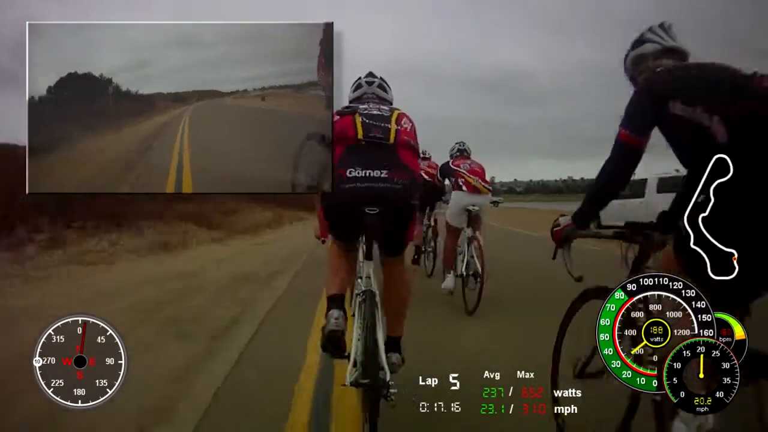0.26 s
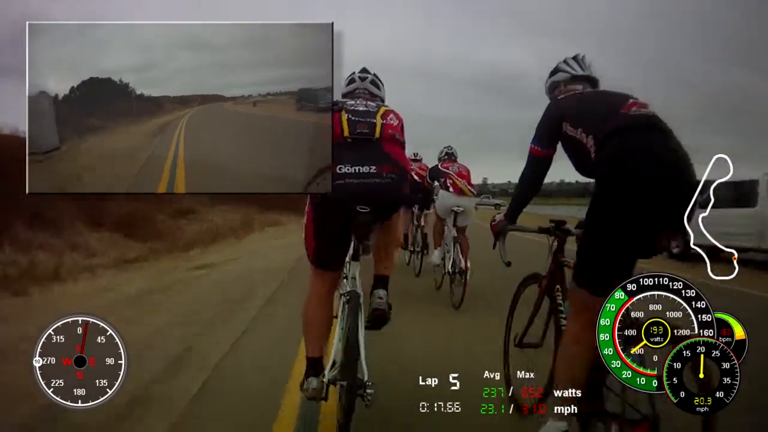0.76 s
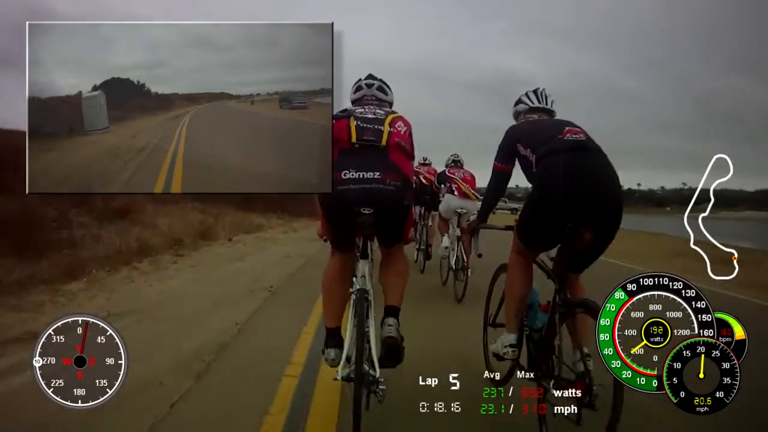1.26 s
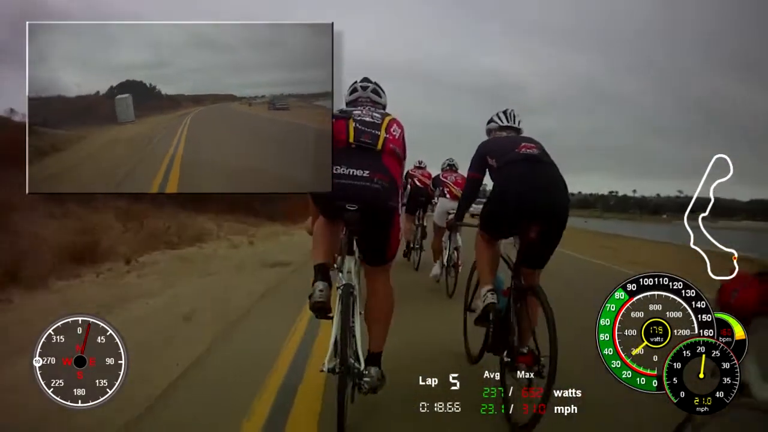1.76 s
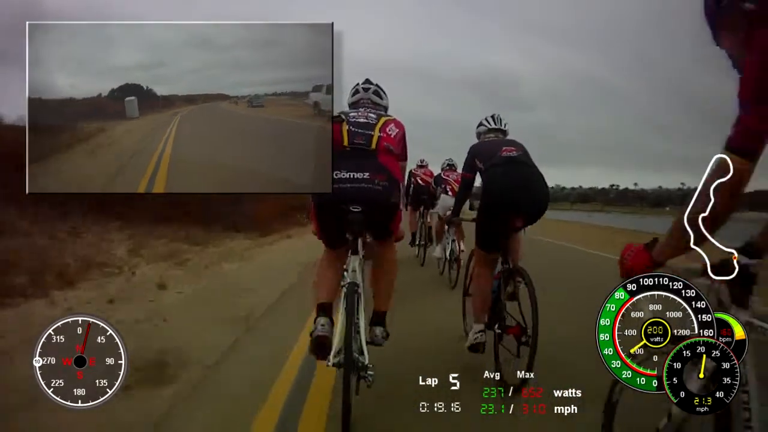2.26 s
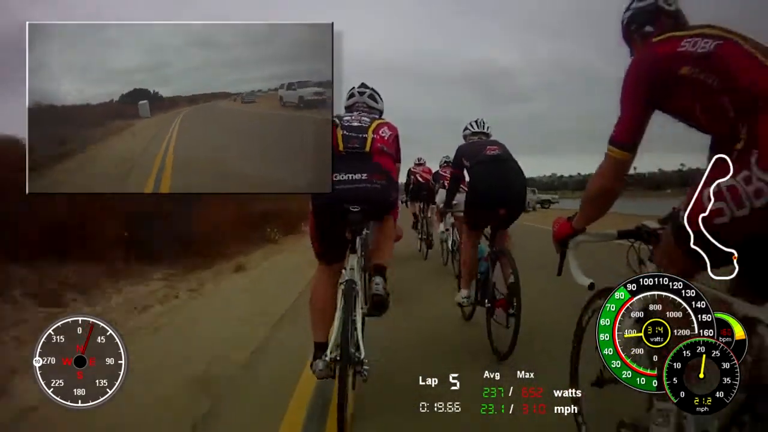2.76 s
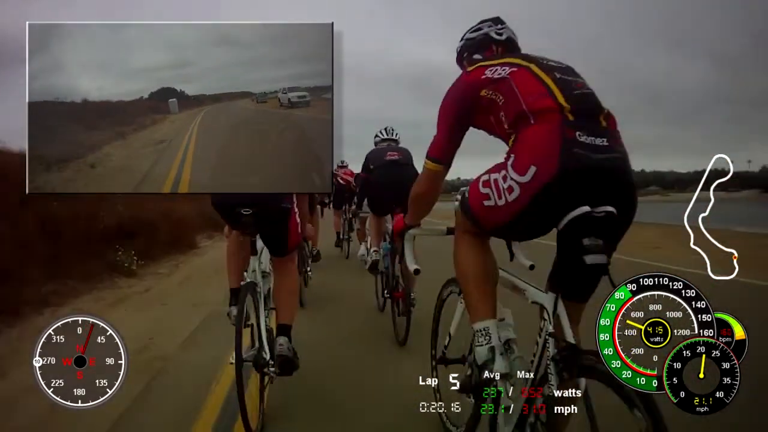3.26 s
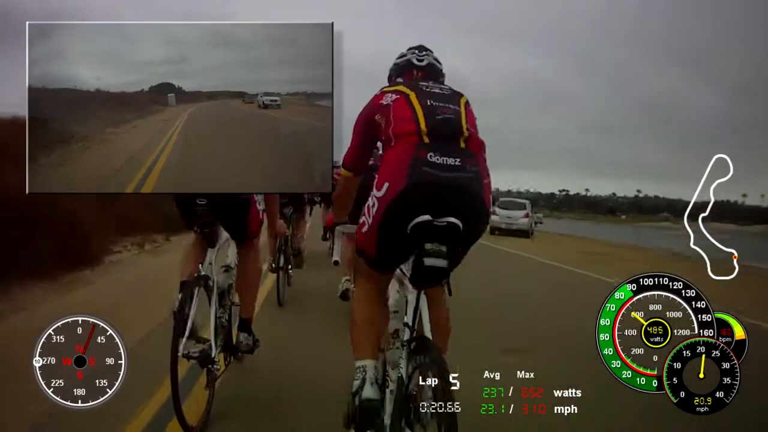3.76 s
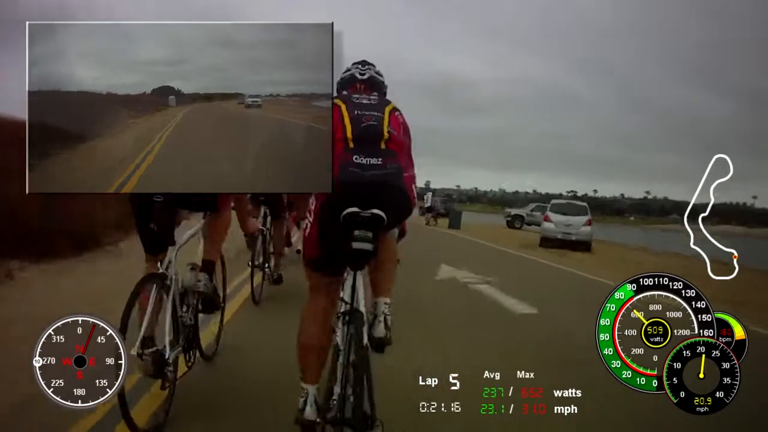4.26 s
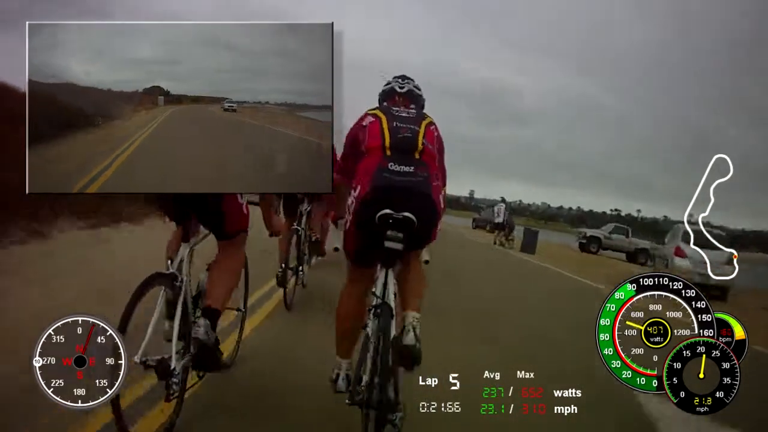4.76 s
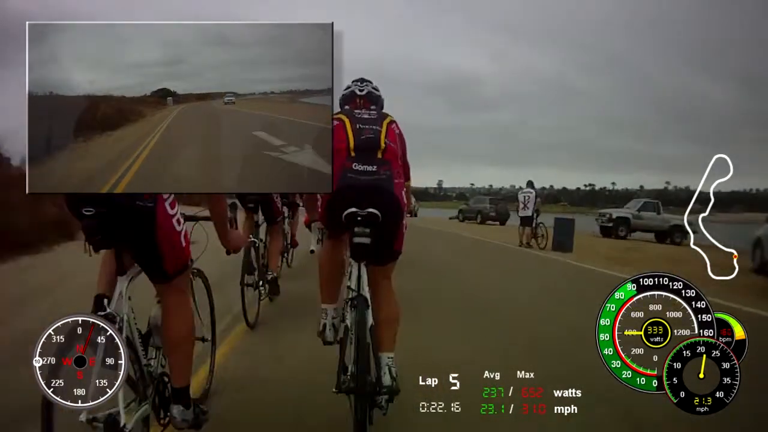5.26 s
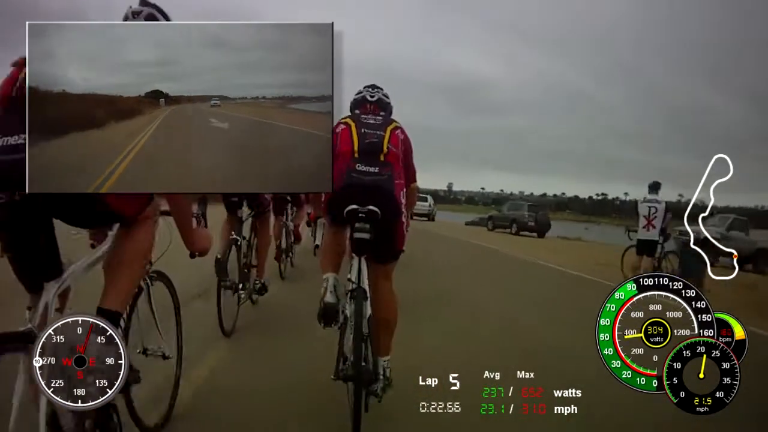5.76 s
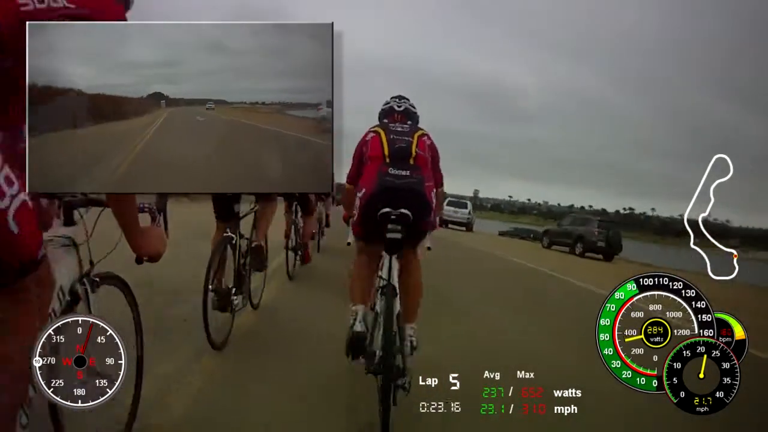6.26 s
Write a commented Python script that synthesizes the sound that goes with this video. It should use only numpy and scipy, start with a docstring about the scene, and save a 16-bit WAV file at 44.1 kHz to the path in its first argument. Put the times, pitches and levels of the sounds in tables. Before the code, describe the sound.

Hard, close clicks and knocks come from a microphone mount shaking on a bicycle as it rides along a paved road. A sharp burst of rattling early on gives way to lighter scattered ticks, then another short burst and a longer, denser clatter to finish. A low hum and the rush of tyres and air continue throughout, with faint wind, hiss and whir.

```python
"""Hard knocks and ticks over a low hum: a camera rattling on a road bicycle that rolls fast over asphalt,
heard mostly through the frame. Loose parts strike and ring the bracket, housing, clamp and mount, in
bursts where the wheels cross seams, with a fine patter in between. Road grain shakes the mount into
its hum. Behind it lie the rush of tyres and air, a low wind rumble, a thin hiss and a faint whir."""
import sys
import numpy as np
from scipy import signal
from scipy.io import wavfile
from scipy.ndimage import uniform_filter1d

SR = 44100
rng = np.random.default_rng(int(sys.argv[2]) if len(sys.argv) > 2 else 0)


def persist_wave(psi):
    """Save psi, clipped to +-1, as 16-bit WAV."""
    counts = np.round(np.clip(psi, -1, 1) * 32767).astype(np.int16)
    wavfile.write(sys.argv[1], SR, np.atleast_2d(counts).T)


N = 286209

# The clear knocks: start_s, blow_db, tick_db, clack_db, thud_db, tilt (above 0 brightens the bracket).
# The blow is the bracket's level; housing tick, clamp clack and mount thud are relative to it.
KNOCKS = [(0.018, -45.5, 2.5, -4.5, 2, 11), (0.0745, -40.5, 0, -4.5, -7, 16),
          (0.1861, -44.0, -1, -7, 3, -3), (0.1962, -44.5, 3.5, -7, 1.5, -10),
          (0.2173, -55.5, 3, -6, -3, -4.0), (0.261, -54, -2, -7, 6, -7.5), (0.285, -46.5, 0, -1, 3.5, 2),
          (0.299, -45.5, 0, -4, -14.0, 5), (0.3289, -44.5, -0.5, -5, -2, -7),
          (0.4224, -44.5, -2.5, 3.5, 6.5, 5), (0.575, -42.5, -6, -3, 0.5, 2), (0.591, -53, 3, -8, -6, 5),
          (0.645, -47.5, 10, 1, -14.0, 7.0), (0.6523, -31.5, -1, -7.5, 0.5, 7),
          (0.6754, -38.5, 6, -1, -10, 2), (0.6828, -27, -1, -8, 0.5, 8), (0.69, -35.5, -10, -8, 1, 18),
          (0.6962, -35.5, 2, 1, 4, -5), (0.7051, -40.5, 2, -1, -16, 19), (0.7106, -27.5, 2, -4, 3, -17),
          (0.7162, -35, -16, -12, -16, -16), (0.72, -44, 3, -7, -10, 2), (0.7257, -37, -4, -3, 4.5, 5),
          (0.7615, -48.5, -5, -1, -10, -2), (0.7679, -48.5, -1, -3, 5, -10.0),
          (0.775, -36, 5, -10, -24, 15), (0.7808, -37.5, -3, -1, 3.5, 11), (0.7977, -33, -3.5, -6, 2, 1),
          (0.8189, -48, 7.5, -4, -13.5, -1.5), (0.8493, -43.5, -0.5, -6, -8, -4.0),
          (0.856, -46, -17, -2, -12, -12.0), (0.863, -48, 3, -6.5, 2, 12), (0.8668, -43.5, -7, -11, 4, 7),
          (1.0222, -51.0, -2, 8, 5, 7), (1.0861, -48.5, 2.5, -3, -10, -1), (1.0999, -43.5, 3, -2, -7, 11),
          (1.2153, -47, -10.5, -1.5, -14, -2.5), (1.3565, -45.0, -15, -1, -12, -6),
          (1.4554, -53, -7, 9.5, 1, -4), (1.5917, -55, -8.0, 7, -3, -5.0),
          (1.6204, -49.5, 2.5, 5.5, -14, 9.5), (1.7429, -42.5, -7.5, -4.5, -12, 16),
          (1.75, -49.5, -10, 1, 8, -14), (1.7764, -46.5, -26, -8, -1.0, -21), (1.819, -52, -9, 3, 13.5, -3),
          (1.844, -56.5, -18, 11, -1, -3), (1.8867, -51.5, 3, 5, 6, 2), (1.9012, -46.0, 1, -5, -14.0, -1),
          (1.9162, -41.5, -2, -14.5, -14.0, 13), (1.978, -50.5, -13, -1, -11, -15),
          (2.0055, -54.5, -6, 6.5, 3, -8.5), (2.0445, -49, -16, 1, 8, 1), (2.082, -55, -4, 8.5, 12, -9.5),
          (2.2393, -43.5, -16, -5.5, -16, -2), (2.3614, -59, -4, 12.5, -4, -6),
          (2.3793, -44, -4.5, -12.5, -10, 15), (2.397, -50, -4, 0, -9, 15), (2.463, -46, -5, -1, 4.5, -14),
          (2.52, -50.5, -2, 3, 12, 16), (2.569, -46.0, -13.5, -0.5, 9.5, -3), (2.5786, -49, -4, -6, 3, -9),
          (2.7293, -47.5, -15, 2.5, -2, 0), (2.8428, -46.0, -7, 3.5, 8, -15),
          (2.9233, -40.5, -4, -10, -6, 12), (3.1056, -46, -8, 1.5, 6.5, -10), (3.1191, -54, 0, 3, 15, 4),
          (3.1311, -52.5, -15, 10, 5.0, -6), (3.182, -61, -11, 17.5, 19, -2.0),
          (3.1923, -44.0, -28, -4, -6, -12.0), (3.2596, -52.5, -21, 4.5, 12.5, -7.5),
          (3.4374, -51.0, -6, -3, 5, -5.5), (3.4606, -54.5, -18, 7.5, 14.5, -16),
          (3.5619, -47.5, -15.5, -3.5, 5.5, -16), (3.65, -49, -17, -10, 3.5, -4),
          (3.752, -50.5, -12, -11, -14, -2), (3.8521, -42, -14, 0.5, 1.5, -4),
          (3.855, -44.5, -15, 3, 2, -4), (3.877, -53.5, -14, 4, 3, -6), (3.882, -50.5, -20.0, 4.5, 10, -4),
          (3.947, -56, 2, -6, -5, -11), (4.0449, -48.5, -22, 2, 5, -9), (4.166, -45, -3, -1.5, -16, 0),
          (4.1838, -52.5, -1, -4, 11, 2), (4.2183, -66, 8, 14.5, 23, 6.5), (4.386, -56.5, -19, 9, 16, 6),
          (4.4055, -42.5, -1, -2, -8, 16), (4.4103, -45, 9, -6, -4, 9), (4.417, -37, 8.5, -4, 0.5, -22),
          (4.4231, -44, -17, -4, -13, -1), (4.4346, -39.5, -14, -7, -12, 11),
          (4.4397, -30.0, -2.5, -2.5, -6, 11), (4.4453, -31.5, 1, -13, 0.5, 30),
          (4.4495, -39, -2.5, -13, 4, -10), (4.512, -48.5, 6, 0.5, -7, -15),
          (4.5328, -52.5, 5, -2.5, 3, -7), (4.549, -53, 6.5, -8, -1, -5.5),
          (4.6108, -47.5, -4.5, 4.5, 9.5, 9), (4.657, -48.0, -5.5, -0.5, -6.0, 7),
          (4.6871, -51, -3, 2, -3, 5), (4.8316, -56.5, 3, 7.5, 9, 0), (4.9007, -47.5, 1, 2, -7, -7),
          (4.95, -50, -6, 5, 6, -19), (5.0226, -50.0, -0.5, 3, 5, 5), (5.129, -47.0, -4, -11, -12, -2),
          (5.158, -48, 3.5, -12, -17, 0.0), (5.164, -52.5, 1, 5, 11.5, -8.0),
          (5.1728, -45, 2, 0.5, -2, 15.5), (5.226, -42.5, -12, -3, 2.5, 1),
          (5.2586, -53.0, 5, -20.0, 6, -5.5), (5.2853, -52, 1, -5, -1, -1.5),
          (5.3655, -56, 4.5, -8, -1, 6.5), (5.4364, -44.0, -0.5, -5, -19, 5.5),
          (5.4566, -48.5, 0, -15, -2, 3.0), (5.4794, -44.5, -2, -12, -15, -1),
          (5.53, -47, -8, 2, -13, -3.5), (5.5412, -48.5, -6, 9.5, 7, -6), (5.5518, -40.5, -9.5, 0, 3, -5),
          (5.56, -46, -13, 4, 2, -11), (5.5886, -51, 4, 3, -8.5, 2), (5.6034, -42.5, -5, -1, -4, 2),
          (5.6215, -46, -1, -5, 0, 12.0), (5.632, -45.5, -1, 0, 0, 0), (5.6459, -44.5, 1, -3, -14.0, 11),
          (5.6512, -39, -10, -7, -3, 10), (5.6654, -47.5, -1, -15, -16, 1),
          (5.6929, -45.5, 4, -12, -15, 13), (5.7235, -43.5, 1, -3.5, -18, 8),
          (5.784, -44.5, -2, -5, -17, 15), (5.7996, -44.5, 0, -16, -20, 8), (5.8079, -44.5, 3, -3, -7, -4),
          (5.816, -46, 2, -10, -15.5, 10), (5.822, -46, 0, 2, 0, -6.0), (5.846, -47.5, -3, -1, -3, 5),
          (5.9178, -40.5, -11, -6, -19, -10), (5.9233, -39.0, -6, -6, 0, 5),
          (5.9369, -45, 0, -19, -14.0, 11.0), (5.9562, -42, -4, 1, 7, 0),
          (5.969, -46.5, -4, 3, -11.5, 10.5), (6.0053, -39, 5.5, -9, -4, 12), (6.0121, -38, -5, -4, 0, 5),
          (6.0239, -36.5, 4, 0, -14, 14), (6.0309, -30, -0.5, -8, 1.5, 7), (6.045, -36, -3, -3, -2, 15),
          (6.0555, -42, 2, -9, -13.5, -3), (6.0632, -46.0, 4, -7, -10, -0.5),
          (6.0702, -38.5, 1, -8.0, -2, 6.5), (6.077, -46, 4, -2, 5, 0), (6.0852, -40, 3, -1.5, -4, 7.0),
          (6.0918, -34.5, -5, -11, -1, 12), (6.0996, -41.0, 5, -5, -16, 10.0), (6.105, -34, -4, -7, -1, 16),
          (6.1151, -40.5, 7, -5, -12, 12.0), (6.1214, -39.5, -4, -8, -7, -2),
          (6.1368, -40, -6, -6, 1.5, -1), (6.203, -47.5, -7, 3.5, -3, -6), (6.2315, -40, -5.5, -21.5, 1, 1),
          (6.2476, -44, 2, -4, -9, 4), (6.2561, -48.5, -5, 8.5, 13, 0), (6.262, -44.5, 3, -3, -11, 7),
          (6.2812, -38.5, -7, -4, -2, -4), (6.2879, -46, -4, 0, 2, 5.0), (6.3046, -43, -7, -2, 1, 3),
          (6.3171, -42.5, 1.5, 0, -14.0, 10.0), (6.3307, -43, 0, -6.5, -13, -12.0),
          (6.3377, -46.5, 1, 6.5, 11.5, -9.0), (6.347, -47.5, 3, 1, -10.5, -1.5),
          (6.3524, -30.5, -4, -12, -2.5, 9), (6.365, -51, -21, -13, 2, -8), (6.378, -43, 3, -10, -13, -4),
          (6.3916, -39.5, 3, -3, -23, 20), (6.397, -42, -2, -19, -14, 11),
          (6.4088, -45.0, -3.5, -14, -10, 3.5), (6.4214, -45.5, 3, -2, -19, 5),
          (6.4356, -45, 4, -18, -14, -5), (6.4524, -47, -1.0, -14, 2, 12.0), (6.4669, -49, 0, 1, 10, 9.5)]
# The modes each part rings with: pitch_hz, width_hz, level_db
MOUNT_MODES = [(281, 31.2, 1), (358, 22.7, -3), (437, 156, -5), (493, 91, -1), (544.6, 50, -5),
               (704.6, 36, -14.5)]
CLAMP_MODES = [(914, 122, -4), (1469, 267, 3.5), (1838, 640, -4)]
BRACKET_MODES = [(2530, 430, -1.5), (3093, 253, 3), (3330, 600, -1.5), (3946, 660, -1), (4640, 230, -12)]
HOUSING_MODES = [(5030, 1800, -6.5), (6430, 560, 5.5), (7390, 1500, -0.5), (9130, 1260, -4),
                 (9400, 600, -18), (10770, 500, -21), (11700, 570, -11.5)]


def knock(blow_db, tick_db, clack_db, thud_db, tilt):
    """A sharp strike inside a soft, short swell rings bracket, housing and clamp; a push thuds the mount."""
    draws = rng.standard_normal((4, 1200))  # one row a part
    place_db, noise = 1.3 * draws[:, :8], draws[:, 8:]  # where the blow lands favours some modes
    t = np.arange(noise.shape[1]) / SR
    strike = amp(10.5) * np.sign(place_db[0, -1]) * (np.arange(len(t)) == round(0.0013 * SR))

    def contact(part, middle_s, width_s, tail_db, fall_s):
        swell = np.exp(-((t - middle_s) / width_s) ** 2)
        tail_gain = amp(tail_db - 0.14 * np.clip(tick_db, -20, 5))  # dull blows have more tail
        settling = tail_gain * (1 - np.exp(-t / 0.002)) * np.exp(-t / fall_s)
        return strike + noise[part] * (swell + settling)

    slope_db = 0.98 * tilt * np.log2(np.array(BRACKET_MODES)[:, 0] / 3200)
    bracket_db = slope_db + place_db[0, :len(BRACKET_MODES)]
    bracket = ring(contact(0, 0.0011, 0.0016, -0.5, 0.0037), BRACKET_MODES, bracket_db)
    tick = ring(contact(1, 0.00078, 0.00084, -10, 0.004), HOUSING_MODES, place_db[1])
    clack = ring(contact(2, 0.00056, 0.00046, 3.3, 0.0036), CLAMP_MODES, place_db[2])
    thud = mount_thud(t, place_db[3])
    layers = [(0, bracket), (tick_db, tick), (clack_db, clack), (thud_db, thud)]
    return amp(blow_db) * sum(amp(db) * unit_burst(sound) for db, sound in layers)


def mount_thud(t, place_db):
    """A brief push on the mount: damped and brighter while the parts touch, with a softer free ring."""
    push = np.sin(np.pi * np.clip(t / 0.0015, 0, 1)) * np.sign(place_db[-1])
    kick = np.diff(push, prepend=0)
    held_modes = [(hz, 21.4 * width, db + 2.0 * np.log2(hz / 300)) for hz, width, db in MOUNT_MODES]
    held = unit_burst(ring(kick, held_modes, place_db))
    free = unit_burst(ring(kick, MOUNT_MODES, place_db))
    return filtered(held + amp(-13) * free, 3, (225, 1100), "band")


def light_knocks(count=55):
    """Rows like KNOCKS for soft random knocks: denser, stronger and brighter as the parts shake more."""
    share = (np.arange(count) + rng.random(count)) / count
    blow, tick, clack, thud, tilt = rng.standard_normal((count, 5)).T
    shake_db = np.minimum(ride_db("patter") + 69, 12)
    odds = np.cumsum(amp(0.55 * shake_db) * touching() ** 2)
    at = np.searchsorted(odds, share * odds[-1]).clip(0, N - 1)
    blow_db = -60 + 0.44 * shake_db[at] + 3.5 * np.minimum(blow, 1)
    tick_db = -9 + 0.3 * shake_db[at] + 2.5 * tick
    return list(zip(at / SR, blow_db, tick_db, 0.46 + 2.5 * clack, 4.4 + 2.5 * thud, -17 + 2.5 * tilt))


def mount_hum(lumps):
    """Lumpy road grain drives the mount's low modes; their pitch sways as grip and load change."""
    grain = filtered(rng.standard_normal(N) * amp(1.13 * lumps), 4, (235, 850), "band")
    clock = np.cumsum(1 + 0.01806 * wander(0.0583))
    swayed = np.interp(clock * N / clock[-1], np.arange(N), ring(grain, MOUNT_MODES))
    return amp(ride_db("hum")) * unit_rms(swayed)


def rolling(lumps):
    """The broad, faintly patchy rush of tyres and air swells with the lumps of the road."""
    # Tone of the rush: frequency_hz, relative_db
    spectrum = [(90, -28), (150, -18.5), (215, -16), (330, -7.5), (550, -19), (820, -15), (1500, -19.5),
                (1950, -19), (3950, -25.5), (4900, -38.5), (7000, -34.5), (12000, -53)]
    points_hz, points_db = np.transpose(spectrum)
    frames, hz = N // 128 + 5, np.fft.rfftfreq(512, 1 / SR)
    real, imag, patches = rng.standard_normal((frames, 257, 3)).T
    patches = unit_rms(uniform_filter1d(uniform_filter1d(patches, 8, axis=0), 10, axis=1))
    shape_db = np.interp(np.log(hz + 1), np.log(points_hz + 1), points_db)[:, None] + 1.5 * patches
    rush = signal.istft((real + 1j * imag) * amp(shape_db), nperseg=512, noverlap=384)[1][:N]
    return amp(-54.5 + 0.35 * (ride_db("patter") + 56.5) + 2.15 * lumps) * unit_rms(rush)


def patter(modes, lumps, base_per_s, spread_db, base_db, follow):
    """Tiny contacts of loose parts, a few larger, crowd together on lumps and when the ride is rough."""
    shake_db = ride_db("patter")
    crowding = amp(6 * lumps + 2 * wander(0.03) + 0.31 * (shake_db + 62.5))
    odds = base_per_s * crowding * touching() / SR
    hits = amp(spread_db * np.minimum(rng.exponential(1, N), 3)) * (rng.random(N) < odds)
    swell = np.exp(-((np.arange(200) / SR - 0.002) / 0.00044) ** 2)
    contacts = signal.oaconvolve(hits, swell)[:N] * rng.standard_normal(N)
    return amp(base_db + follow * (shake_db + 66)) * unit_rms(ring(contacts, modes))


def wind_rumble():
    """Low, nearly steady wind on the housing."""
    low = filtered(rng.standard_normal(N), 2, (35, 170), "band")
    return amp(-72 + wander(0.099)) * unit_rms(low)


def hiss_and_whir(whir_hz=2100, width_hz=160):
    """Air hisses evenly past the housing beside a faint, wavering whir, likely the chain."""
    air, chain = rng.standard_normal((2, N))
    hiss = filtered(air, 2, 4800, "high")
    whir = resonate(resonate(chain, whir_hz, width_hz), whir_hz, width_hz)
    return amp(-82.5) * unit_rms(hiss) + amp(-77 + 2.5 * wander(0.062)) * unit_rms(whir)


def ride_db(layer):
    """How hard the ride drives "hum" or "patter": the slow state of the road plus a share of each jolt."""
    # Roughness along the road: time_s, hum_db, patter_db
    road = [(0.0, -45.5, -60.5), (0.116, -58, -70.5), (0.47, -53.5, -67), (0.76, -49, -60.5),
            (1.0, -49.5, -65.5), (1.399, -51.5, -68.5), (1.749, -50, -63), (2.502, -50, -64),
            (2.656, -51, -71), (2.941, -47, -62), (3.301, -50.5, -65), (4.098, -51, -69.5),
            (4.502, -49, -61), (5.101, -52, -64.5), (5.65, -49.5, -54), (5.9, -49, -57.5),
            (6.08, -50.5, -48), (6.17, -46.5, -65), (6.24, -47, -42.5), (6.33, -46, -50),
            (6.49, -49.5, -55.5)]
    time_s, hum_db, patter_db = np.transpose(road)
    road_db, jolt_share = {"hum": (hum_db, 0.012), "patter": (patter_db, 0.55)}[layer]
    t = np.arange(N) / SR
    return np.interp(t, time_s, road_db) + jolt_share * np.interp(t, *jolts())


def jolts(rise_s=0.0067, settle_s=0.028, reference_db=-46):
    """Shaking builds quickly into each clear knock and settles after it; gives times and levels in dB."""
    start_s, blow_db, *_ = np.transpose(KNOCKS)
    t = np.arange(0, N / SR + 0.01, 0.002)[:, None]
    envelopes = np.exp(-abs(t - start_s) / np.where(t < start_s, rise_s, settle_s))
    power = (amp(blow_db - reference_db) ** 2 * envelopes).sum(axis=1)
    return t[:, 0], 10 * np.log10(power + 0.1)


def touching(lift_s=0.012):
    """Loose parts lift off just before a clear knock: 1 in contact, 0 in flight."""
    start_s = np.append(np.transpose(KNOCKS)[0], np.inf)
    t = np.arange(N) / SR
    until_knock_s = start_s[np.searchsorted(start_s, t)] - t
    return 1 - np.exp(-(until_knock_s / lift_s) ** 2)


def ring(drive, modes, offsets_db=None):
    """A part rings with all its modes, in alternating polarity, each with an optional level offset."""
    if offsets_db is None:
        offsets_db = np.zeros(len(modes))
    return sum((-1) ** k * amp(db + offsets_db[k]) * resonate(drive, hz, width)
               for k, (hz, width, db) in enumerate(modes))


def resonate(x, hz, width_hz):
    """A two-pole resonance with gain 1 at its peak."""
    return signal.lfilter(*signal.iirpeak(hz, hz / width_hz, SR), x)


def filtered(x, order, edges_hz, kind):
    return signal.sosfilt(signal.butter(order, edges_hz, kind, fs=SR, output="sos"), x)


def wander(seconds):
    """A smooth random drift of rms 1."""
    size = max(round(seconds * SR), 1)
    return unit_rms(uniform_filter1d(uniform_filter1d(rng.standard_normal(N), size), size))


def amp(db):
    return 10 ** (np.asarray(db) / 20)


def unit_rms(x):
    return x / np.sqrt(np.mean(x ** 2) + 1e-20)


def unit_burst(x):
    """Scales a hit so that its loudest 2 ms have rms 1."""
    return x / np.sqrt(uniform_filter1d(x ** 2, 88).max())


def scene():
    """Clear and light knocks over a bed of patter, hum, tyres and air, in mono."""
    lumps = wander(0.014)  # unevenness of the asphalt under the wheels
    mix = patter(CLAMP_MODES + BRACKET_MODES, lumps, 300, spread_db=3.4, base_db=-62.5, follow=0.45)
    mix += patter(HOUSING_MODES, lumps, 240, spread_db=2.5, base_db=-73, follow=0.48)
    mix += patter(CLAMP_MODES, lumps, 33, spread_db=6.9, base_db=-69.5, follow=0.21)
    mix += mount_hum(lumps) + wind_rumble() + rolling(lumps) + hiss_and_whir()
    for start_s, *voicing in light_knocks() + KNOCKS:
        sound = knock(*voicing)
        slot = mix[round(start_s * SR):][:len(sound)]
        slot += sound[:len(slot)]
    return mix[None]


def record(dry):
    """The microphone falls away steeply above 12 kHz; a band limit cuts off the treble that remains."""
    capsule = signal.sosfilt(signal.cheby1(7, 0.5, 11650, fs=SR, output="sos"), dry)
    band_limit = signal.firwin(511, 13345, window=("kaiser", 9), fs=SR)
    return signal.oaconvolve(capsule, band_limit[None], "same")


dry = scene()
out = record(dry)
persist_wave(out)
```